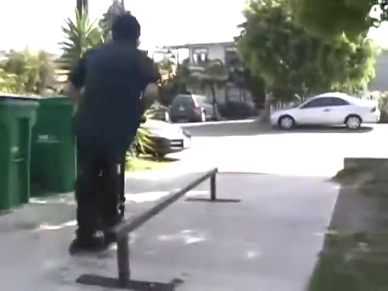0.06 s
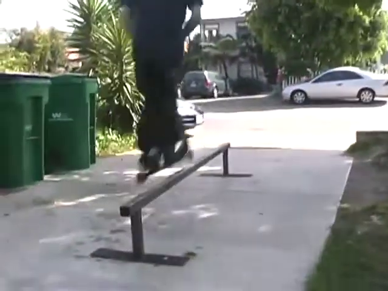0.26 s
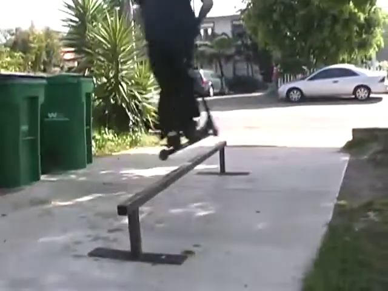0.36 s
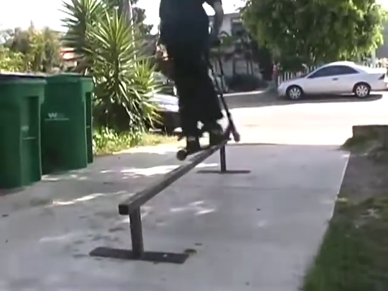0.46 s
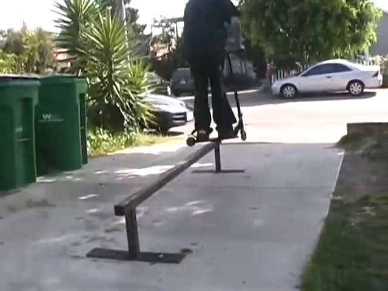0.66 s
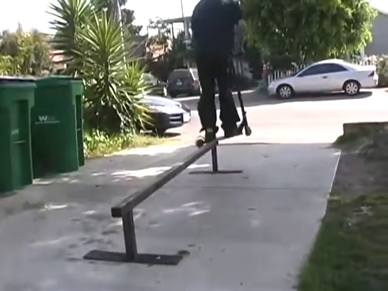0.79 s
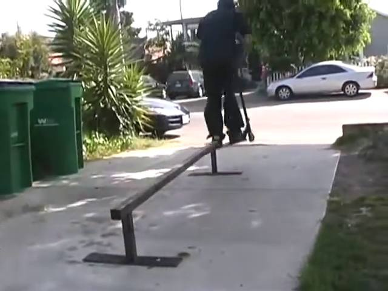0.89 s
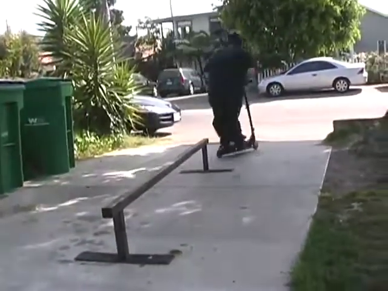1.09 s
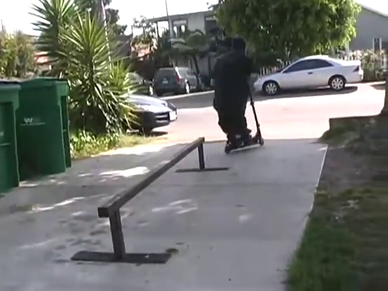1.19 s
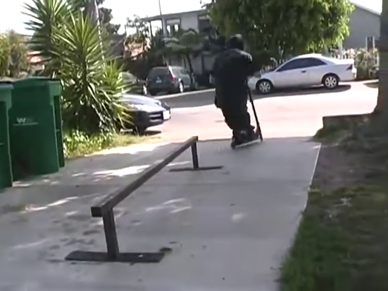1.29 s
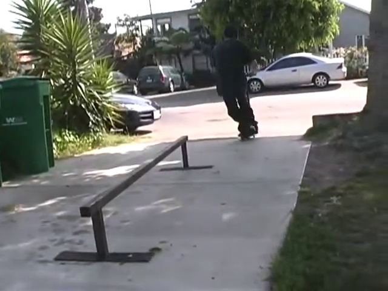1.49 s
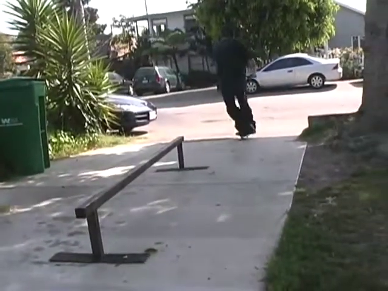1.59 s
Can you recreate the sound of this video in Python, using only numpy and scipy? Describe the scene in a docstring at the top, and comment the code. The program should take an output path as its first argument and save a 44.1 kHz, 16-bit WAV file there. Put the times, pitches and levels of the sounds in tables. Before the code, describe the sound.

Close by in a driveway, a rattling kick scooter jumps onto a metal rail, scrapes along it, then thuds down and rolls off. The loudest hits slightly overload the small microphone, while an engine hums out in the street.

```python
"""A concrete driveway between house walls, heard through a small microphone; an engine drones out in the
street. A kick scooter rolls up close, hops, and its loose parts rattle in the air. At half a second it
slams onto a steel rail, which rings as the deck grinds along it. It knocks over the rail's end, lands
with a thud at one second and rolls away rattling. The walls throw each blow back, and the loudest hits
overload the microphone."""
import sys
import numpy as np
from scipy import signal
from scipy.fft import rfft, irfft, next_fast_len
from scipy.io import wavfile
from scipy.ndimage import uniform_filter1d

SR = 44100
rng = np.random.default_rng(int(sys.argv[2]) if len(sys.argv) > 2 else 0)


def to_wav(s):
    """Save 16-bit WAV."""
    ch = np.atleast_2d(s).T  # columns
    pcm = np.round(np.clip(ch, -1, 1) * 32767)  # PCM
    wavfile.write(sys.argv[1], SR, pcm.astype(np.int16))


N = 72765
T = np.arange(N) / SR


def from_db(db):
    """Decibels to gain."""
    return 10 ** (np.asarray(db) / 20)


def rms_one(x):
    """Scale to rms 1."""
    return x / np.sqrt(np.mean(x ** 2) + 1e-20)


def in_time(rows):
    """Rows of (seconds, value) as a curve at every sample."""
    return np.interp(T, *np.transpose(rows))


def at_hz(rows, hz, column=1):
    """Read one column of a table on a log-frequency axis."""
    rows = np.array(rows)
    return np.interp(np.log(hz + 1), np.log(rows[:, 0]), rows[:, column])


def colour(x, spectrum):
    """Causal (minimum-phase) filter that keeps the power of white noise."""
    size = 2 * next_fast_len(N)
    gains = rms_one(from_db(at_hz(spectrum, np.fft.rfftfreq(size, 1 / SR))))
    cepstrum = irfft(np.log(gains))
    cepstrum[1:size // 2] *= 2
    cepstrum[size // 2 + 1:] = 0
    return irfft(rfft(x, size) * np.exp(rfft(cepstrum)))[:N]


def band(x, hz, kind):
    """Butterworth filter."""
    return signal.sosfilt(signal.butter(2, hz, kind, fs=SR, output="sos"), x + 1e-18)


def ring(x, hz, t60):
    """One mode: a unit click starts a sine of height 1 that falls 60 dB in t60 seconds."""
    radius, angle = from_db(-60 / (t60 * SR)), 2 * np.pi * hz / SR
    return signal.lfilter([0, np.sin(angle)], [1, -2 * radius * np.cos(angle), radius ** 2], x + 1e-18)


def body(x, modes):
    """All modes of a metal part, driven by x with alternating signs."""
    return sum(from_db(db) * ring(x, hz, t60) * (-1) ** k for k, (hz, db, t60) in enumerate(modes))


def clicks(rows):
    """One click for each (seconds, dB)."""
    out = np.zeros(N)
    for start, db in rows:
        out[int(start * SR)] += from_db(db)
    return out


def grains(per_s, spread_db):
    """Tiny random contacts of uneven size; rms 1."""
    sizes = from_db(spread_db * np.minimum(rng.exponential(1, N), 4)) * rng.choice([-1, 1], N)
    return rms_one(sizes * (rng.random(N) < per_s / SR))


# The street's rumble. Each row: frequency in Hz, relative level in dB.
STREET_SPECTRUM = [(20, -20), (40, 3.5), (90, 4), (160, -3.5), (230, -10.5), (330, -24), (600, -22.5),
                   (1100, -22), (2000, -22.5), (5000, -28.5), (9000, -40.5), (16000, -79)]
def street():
    """Steady low traffic noise from beyond the driveway."""
    return from_db(-38) * colour(rng.standard_normal(N), STREET_SPECTRUM)


# The engine's pitch. Each row: time in seconds, firing rate in Hz.
ENGINE_FIRING = [(0, 68.6), (.24, 63.5), (.33, 56.3), (.52, 55.74), (.74, 59.32), (.87, 61.2), (1.05, 63.3),
                 (1.14, 66.8), (1.3, 68.07), (1.38, 68.3), (1.54, 69.1), (1.65, 76.6)]
# The engine at the microphone. Each row: time in seconds, level in dB.
ENGINE_LEVEL = [(0, -37.5), (.19, -44), (.24, -25), (.305, -41), (.34, -32.5), (.38, -37), (.56, -33),
                (.70, -32.5), (.745, -24), (.83, -35), (.97, -24.5), (1.17, -28.5), (1.37, -25),
                (1.42, -36), (1.5, -28.5), (1.65, -44)]
def engine():
    """Out in the street an engine sags, then picks up speed; only its lowest tone carries this far."""
    phase = 2 * np.pi * np.cumsum(in_time(ENGINE_FIRING)) / SR
    return np.sqrt(2) * from_db(in_time(ENGINE_LEVEL)) * np.sin(phase)


# The house walls' echo. Each row: frequency in Hz, relative level in dB, t60 in seconds.
WALL_TAIL = [(204, 1, 0.2), (1000, -11, 0.31), (2920, -11, 0.44), (6940, -16.5, 0.64), (13900, -6.5, 0.097)]
def yard_echo(x):
    """Quick scatter from nearby ground and bins, then a tail from the walls, shortest at the very top."""
    onset = np.clip((T - 0.003) / 0.0038, 0, 1)
    scatter = rms_one(rng.standard_normal(N) * onset * np.exp(-T / 0.014))
    response = from_db(-7.5) * scatter
    edges_hz = np.geomspace(100, 16000, 9)
    for low, high in zip(edges_hz, edges_hz[1:]):
        hz = np.sqrt(low * high)
        decay = from_db(-60 * T / at_hz(WALL_TAIL, hz, column=2))
        tail = rms_one(rng.standard_normal(N) * onset * decay)
        response += from_db(at_hz(WALL_TAIL, hz)) * band(tail, [low, high], "band")
    return signal.fftconvolve(x, response / np.sqrt(N))[:N]


# Wheels on concrete, at the microphone. Each row: time in seconds, level in dB.
ROLL_LEVEL = [(0, -38.5), (.18, -42.5), (.26, -60), (.48, -39), (1.02, -45), (1.08, -30), (1.16, -39),
              (1.25, -43), (1.38, -50.5), (1.65, -45)]
# The crunch of grit. Each row: frequency in Hz, relative level in dB.
GRIT_SPECTRUM = [(200, 18), (400, -23), (700, -46), (1100, 2), (1700, -2), (3000, 0.5), (6000, -2.5),
                 (10000, -8.5), (13000, -15.5), (16000, -18)]
def wheels():
    """Hard wheels crunch over grit, and drone on the run-up, close to the microphone."""
    take_off_s = 0.195
    grit = grains(per_s=3000, spread_db=2.0)
    run_up = np.clip((take_off_s - T) / 0.016, 0, 1)
    drone = from_db(-52) * rms_one(ring(grit, hz=464, t60=0.02)) * run_up
    return colour(grit, GRIT_SPECTRUM) * from_db(in_time(ROLL_LEVEL)) + drone


# A loose washer's modes. Each row: frequency in Hz, level in dB, t60 in seconds.
WASHER_MODES = [(2170, -11, 0.071), (4260, -2, 0.065), (4750, -10, 0.066), (5850, -8, 0.04)]
# The bump that shakes it. Each row: start in seconds, level in dB.
WASHER_HITS = [(1.6225, -25.5)]
def washer():
    """Farther off, a bump in the pavement makes a washer ping as the scooter rolls away."""
    return body(clicks(WASHER_HITS), WASHER_MODES)


# Thuds of the deck. Each row: start in seconds, level in dB, frequency in Hz, t60 in seconds.
DECK_THUDS = [(0.499, -20.5, 202, 0.11), (.803, -26, 625, 0.067), (.847, -26.5, 665, 0.054),
              (1.032, -12, 160, 0.033), (1.054, -9, 186, 0.06), (1.056, -9, 98.4, 0.1)]
def deck_thuds():
    """The rider's weight comes down and the deck thuds, dull and quickly damped."""
    return sum(ring(clicks([(start, db)]), hz, t60) for start, db, hz, t60 in DECK_THUDS)


# Modes of deck and fork. Each row: frequency in Hz, level in dB, t60 in seconds.
DECK_MODES = [(1084, 0.5, 0.15), (1225, -15, 0.32), (2295, 8, 0.11), (2490, 0, 0.076), (2680, 3, 0.088),
              (2860, -1, 0.09), (4120, -2, 0.064)]
# Blows on the deck. Each row: start in seconds, level in dB.
DECK_HITS = [(.848, -32), (1.033, -19)]
def deck_ring():
    """Deck and fork ring at the rail's end and again on landing."""
    return body(clicks(DECK_HITS), DECK_MODES)


# The steel rail's modes. Each row: frequency in Hz, level in dB, t60 in seconds.
RAIL_MODES = [(498, -20, 0.53), (749.6, -15.5, 0.64), (1035, -2, 0.22), (1470, -5.5, 0.25),
              (1519, 3.5, 0.12), (1911, -4.5, 0.22), (2088, 3.5, 0.11), (2860, -9, 0.31), (3198, 3.5, 0.24),
              (3276, -3, 0.29), (3630, -12, 0.22), (3790, -5, 0.12), (4060, 1, 0.21), (7100, 0, 0.16)]
# Blows on the rail. Each row: start in seconds, level in dB.
RAIL_HITS = [(.496, -17.5), (.812, -35.5)]
def rail_ring():
    """The rail clangs as the scooter slams on, and more softly as it knocks over the end."""
    return body(clicks(RAIL_HITS), RAIL_MODES)


# Friction of the deck along the rail. Each row: time in seconds, level in dB.
GRIND_LEVEL = [(.50, -10.5), (.56, -21), (.593, -25), (.610, -16.5), (.645, -24.5), (.682, -27),
               (.705, -19.5), (.76, -21), (.785, -30), (.83, -22.5), (.88, -37), (.93, -43)]
# Metal scraping on metal. Each row: frequency in Hz, relative level in dB.
SCRAPE_SPECTRUM = [(150, -7), (350, -15), (600, -17.5), (1130, -3), (1600, -11), (2300, -1), (3500, -2.5),
                   (5200, -1), (7500, -8), (10000, -16.5), (16000, -35.5)]
def grind():
    """The sliding deck snags thousands of times a second; it keeps the rail ringing but also damps it."""
    sliding = (T > GRIND_LEVEL[0][0]) & (T < GRIND_LEVEL[-1][0])
    snags = grains(per_s=5500, spread_db=3.2) * from_db(in_time(GRIND_LEVEL)) * sliding
    damped_modes = [(hz, db, 0.6 * t60) for hz, db, t60 in RAIL_MODES]
    ringing = from_db(-25) * body(snags, damped_modes) / len(damped_modes)
    return colour(snags, SCRAPE_SPECTRUM) + ringing


# The frame's chatter. Each row: frequency in Hz, relative level in dB.
FRAME_SPECTRUM = [(100, -2.5), (350, -13), (650, -9.5), (1100, -2), (1800, -2.5), (3000, 2), (4500, 1.5),
                  (7000, -2), (9000, -6), (11500, -16), (13000, -14), (16000, -30)]
# Blows on the frame, from take-off to rolling away. Each row: start in seconds, level in dB, attack and
# hold in seconds, bass and treble gain in dB, then a loose part's pitch in Hz, its level in dB relative
# to the blow, its bandwidth in Hz.
FRAME_BLOWS = [ (0.16, -44.5, 0.01, 0.01, 9.5, 6, 2960, -9, 900),
               (0.1852, -31, 0.00046, 0.0075, 4, -3, 5350, 6.5, 1810),
               (0.194, -16.5, 0.01, 0.003, 2.5, 6, 6950, 4, 597),
               (0.200, -23.5, 0.0027, 0.004, 6.5, -1, 1420, 11, 130),
               (0.233, -16, 0.0055, 0.0043, -6, -5, 3394, 2, 280),
               (0.242, -18.5, 0.00093, 0.00097, 3.5, 2, 4480, 7, 400),
               (0.26, -28.5, 0.0015, 0.011, -1, -2, 2857, 5, 397),
               (.347, -37.5, 0.0019, 0.00083, -6, -14, 1610, 3.5, 300),
               (0.353, -29.5, 0.00098, 0.0042, -20, -12, 2926, -2, 650),
               (.361, -47.5, 0.0012, 0.0052, 2, 4, 2114, 11, 120),
               (.362, -42.5, 0.0013, 0.0026, -15, -8, 6150, 10, 150),
               (.407, -39, .001, 0.0037, -14.5, -21, 2016, 4.5, 880),
               (0.493, -6, 0.0028, 0.0086, 0, -9, 3095, -6.5, 119),
               (0.514, -19, 0.0078, 0.0075, 8, -9, 3855, 4.5, 282),
               (0.796, -19, 0.0055, 0.013, -12, 0.5, 2250, 4, 170),
               (0.808, -18, 0.0033, 0.0024, 4, 9, 4400, 3.5, 403),
               (0.845, -17, 0.0021, 0.0063, -4.5, 0.5, 3086, 1, 298),
               (0.874, -25.5, 0.0025, 0.0061, -4, -8, 4410, 3, 160),
               (0.943, -37, 0.00097, 0.0025, 1, 1, 4270, 0, 197.7),
               (1.0305, -9, 0.0019, 0.005, 3, -1.5, 3244, -2.5, 70),
               (1.056, -16, 0.0025, 0.0032, 0.5, 3, 968, -7.5, 197),
               (1.136, -37, 0.0018, 0.0034, 7.5, 2.5, 416, 0, 109),
               (1.42, -46, 0.00077, 0.0027, 11.5, 7.5, 6440, 2, 500),
               (1.427, -44, 0.004, 0.0031, 4, -19, 4560, 8, 197),
               (1.456, -42.5, 0.002, 0.002, 13.5, 3, 9180, -0.5, 800),
               (1.618, -40, 0.0044, 0.0016, 5.5, 1, 4426, 12.5, 168)]
def frame_blows():
    """Each blow is a crack of metal chatter plus a loose part's unsteady ring; gives (cracks, rings)."""
    bass_hz, treble_hz = 1770, 5800
    crack_release_s, part_release_s = 0.0046, 0.0022
    chatter = colour(grains(per_s=14000, spread_db=3), FRAME_SPECTRUM)
    bass, treble = band(chatter, bass_hz, "low"), band(chatter, treble_hz, "high")
    middle = band(band(chatter, bass_hz, "high"), treble_hz, "low")
    cracks, rings = np.zeros((2, N))
    for start, db, attack, hold, bass_db, treble_db, hz, part_db, width_hz in FRAME_BLOWS:
        first = int(start * SR)
        t = T[:min(N - first, SR // 10)]
        span = slice(first, first + len(t))
        rise = np.minimum(t / attack, 1) ** 2
        since_hold = np.maximum(t - attack - hold, 0)
        # The middle is inverted so that the bands do not cancel where they meet.
        crack = from_db(bass_db) * bass[span] - middle[span] + from_db(treble_db) * treble[span]
        cracks[span] += from_db(db) * rise * crack * np.exp(-since_hold / crack_release_s)
        jolts = uniform_filter1d(rng.standard_normal(SR // 10), size=12)[:len(t)]
        phase_drift = np.cumsum(jolts) * np.sqrt(2 * np.pi * width_hz / SR)
        part = np.sqrt(2) * np.sin(2 * np.pi * hz * t + phase_drift)
        rings[span] += from_db(db + part_db) * rise * part * np.exp(-since_hold / part_release_s)
    return cracks, rings


def scene():
    """One microphone position: the scooter close by, the walls around it, the street behind."""
    cracks, rings = frame_blows()
    echo = yard_echo(cracks + from_db(-9) * rings)   # small parts reach the walls more weakly
    scooter = cracks + rings + grind() + rail_ring() + deck_ring() + deck_thuds() + washer() + wheels()
    return (scooter + echo + engine() + street())[None]


def record(dry):
    """The small microphone squashes loud peaks and loses the very top."""
    overload, cutoff_hz = 0.68, 15800
    squashed = dry / (1 + (dry / overload) ** 4) ** (1 / 4)
    return signal.sosfilt(signal.ellip(12, 0.1, 70, cutoff_hz, fs=SR, output="sos"), squashed)


dry = scene()
out = record(dry)
to_wav(out)
```